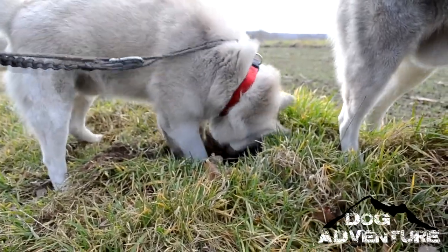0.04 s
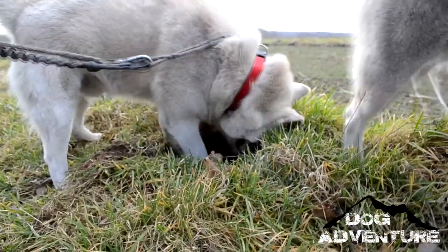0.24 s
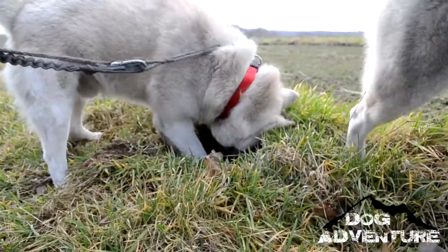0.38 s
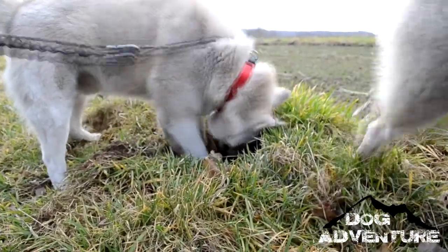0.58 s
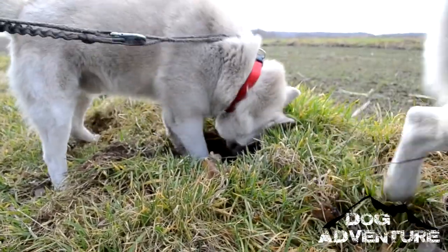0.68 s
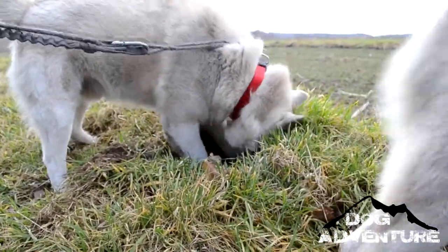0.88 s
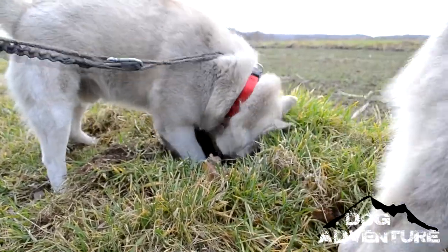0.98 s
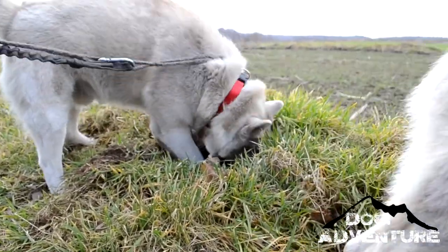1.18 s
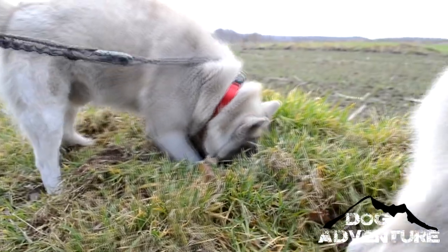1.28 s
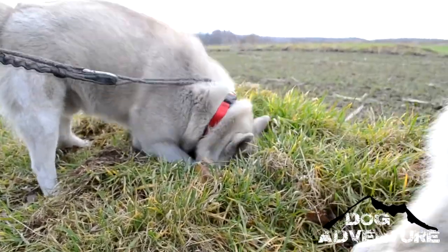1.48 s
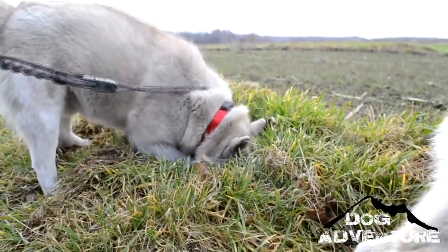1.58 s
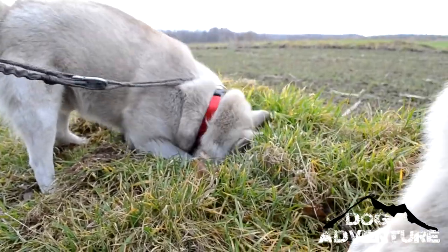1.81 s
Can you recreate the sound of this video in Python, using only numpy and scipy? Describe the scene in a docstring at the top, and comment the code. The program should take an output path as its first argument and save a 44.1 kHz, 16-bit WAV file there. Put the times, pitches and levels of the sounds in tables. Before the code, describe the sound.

A dog digs in grassy turf with dull paw thuds and dry rustling, then snuffles.

```python
"""A grassy field in faint wind: one dog digs while a second steps past close to the microphone.
Paws thud dully on the turf and loose soil settles after each blow. Dry blades rustle and rasp,
stalks snap, roots tear fibre by fibre, and the digging dog puffs air through the soil in its hole.
Everything is heard close up and without echo, on a small microphone with a dip in the treble."""
import sys
import numpy as np
from scipy import signal
from scipy.fft import rfft, irfft
from scipy.io import wavfile

SR = 44100
rng = np.random.default_rng(int(sys.argv[2]) if len(sys.argv) > 2 else 0)


def transcribe(u):
    """Save the signal u as a 16-bit wav file named by the first command-line argument.

    u: samples, shape (n,) or (channels, n), limited to [-1, 1]; the rate is SR.
    q: integer samples, one column per channel.
    """
    v = np.clip(np.atleast_2d(u).T, -1, 1)
    q = np.round(v * 32767).astype(np.int16)
    wavfile.write(sys.argv[1], SR, q)


N = 81585

# Paws striking the turf. Each row: time in seconds, peak level in dB, pitch in Hz.
PAW_BLOWS = [(0.4424, -36.5, 148), (0.4592, -29, 216), (0.477, -17, 198), (0.4831, -19.5, 255),
             (.487, -29, 221), (0.5107, -33, 219), (.5195, -33.5, 346), (0.5252, -26.5, 169),
             (0.5474, -18.5, 160), (0.5693, -22.5, 370), (0.5718, -16, 480), (0.59, -33.5, 360),
             (0.6097, -33.5, 219), (0.6403, -13.5, 192), (.6518, -21.5, 285), (0.6568, -29, 195),
             (0.6798, -27.5, 255), (0.687, -31.5, 280), (0.7078, -25.5, 168), (0.7282, -31, 390),
             (0.7317, -30, 282), (.7527, -22, 158), (0.7631, -29.5, 231), (0.7817, -38, 150),
             (0.8032, -26.5, 194), (0.8819, -29, 185), (.898, -36.5, 207), (0.965, -41, 300),
             (1.056, -42.5, 332), (1.1345, -28.5, 122), (1.141, -27, 454), (1.1442, -11, 335),
             (1.1549, -26.5, 120), (1.161, -31.5, 242), (1.222, -40, 330), (1.448, -40.5, 163),
             (1.486, -36.5, 107), (1.7700, -35.5, 170), (1.7942, -36.5, 244), (1.8044, -35.5, 194)]
TURF_CYCLES = 0.55  # turf hardly rings
# Loose soil settling after a blow. Each row: frequency in Hz, gain in dB.
CRUMBLE_SPECTRUM = [(30, -21), (100, -7), (250, 4.5), (500, -8.5), (800, -10.5), (1500, -32), (3000, -60)]
CRUMBLE_DB, CRUMBLE_DECAY_S = -18.5, 0.0074  # level is relative to the blow
# The ground trembling under the paws. Each row: time in seconds, level in dB.
TREMOR_LEVELS = [(0, -87), (.19, -82), (.24, -60), (.32, -60), (.41, -74), (.47, -36), (.7, -40),
                 (.86, -49), (.96, -69), (1.1, -56), (1.28, -76), (1.42, -49), (1.52, -50.5), (1.58, -76),
                 (1.68, -67.5), (1.78, -50.5), (1.85, -56)]
# The low tone of that trembling. Each row: frequency in Hz, gain in dB.
TREMOR_SPECTRUM = [(15, -46), (40, -0.5), (100, 0.5), (200, -10), (400, -19), (700, -31), (1500, -67)]

# Legs brushing the grass. Each row: time in seconds, level in dB, brightness in dB per octave.
GRASS_BRUSHING = [(0, -55.5, 0.5), (.1, -50, -1), (.195, -45.5, -0.5), (.235, -36, 0), (.28, -40.5, -1.2),
                  (.37, -43, -1), (.46, -42, -.5), (.53, -38, 0.5), (.555, -41, 0.5), (.59, -37, 1.5),
                  (.64, -43, 0), (.7, -42.5, 1), (.77, -37.5, 1), (.815, -41.5, -0.5), (.88, -39.5, 2),
                  (1.0, -44, -1.5), (1.04, -47, 0), (1.12, -51.5, -2.6), (1.2, -46.5, -1.5),
                  (1.52, -49.5, -2.5), (1.63, -61, -3.5), (1.73, -61, -3), (1.765, -52, -2),
                  (1.79, -60.5, -1.5), (1.85, -51, -.5)]
# The tone of dry blades, close up. Each row: frequency in Hz, gain in dB.
GRASS_SPECTRUM = [(100, -8.5), (400, -6), (800, -2.5), (1300, 0), (1950, 1), (2450, -2), (3200, 0.5),
                  (4500, -4), (7000, -4), (9300, -0.5), (11000, -11)]

# Roots and tufts tearing. Each row: peak time, rise and fall in seconds, level in dB.
ROOT_PULLS = [(0.853, 0.021, 0.019, -30.5), (0.899, 0.0088, 0.02, -36.5), (.941, .008, 0.017, -41),
              (0.9628, .0006, 0.0072, -32.5), (0.991, 0.021, 0.017, -38)]
# The tone of breaking root fibres. Each row: frequency in Hz, gain in dB.
ROOT_SPECTRUM = [(150, -19), (600, -3.5), (1400, 4), (2500, 3), (3900, 0.5), (5000, 8), (6400, 2),
                 (9000, 0), (11000, -3.5)]

# Dry stalks breaking. Each row: start in seconds, level in dB, pitch in Hz, decay in seconds.
STALK_SNAPS = [(0.015, -39, 4000, .001), (.023, -41, 5000, 0.0012), (0.1204, -35, 3460, 0.001),
               (.156, -46, 6000, .002), (.1698, -27, 6400, 0.0015), (0.2058, -34, 5000, 0.00084),
               (0.2085, -29, 3460, 0.0016), (0.3, -37, 3190, 0.0053), (.431, -38, 6070, 0.0025),
               (0.476, -37.5, 6050, 0.0038), (0.5002, -34, 4000, 0.0018), (.553, -26.5, 6960, 0.00072),
               (0.564, -24.5, 5700, 0.00064), (0.578, -30.5, 7600, 0.0029), (0.6224, -38, 7000, 0.0013),
               (.6625, -35, 8000, .0012), (0.708, -31.5, 9000, 0.0021), (.9622, -29, 3600, 0.0013),
               (.968, -37, 5000, .0015), (1.052, -46, 8000, 0.0017), (1.208, -40, 2500, 0.0033),
               (1.3985, -34.5, 3460, 0.0013), (1.4474, -34, 5000, 0.00045), (1.5353, -33, 4000, 0.00063),
               (1.611, -41, 6000, 0.00055), (1.756, -50, 8000, 0.0031)]
SNAP_OCTAVES, SNAP_TOP_HZ = 0.84, 10400  # half width around the pitch; upper limit of the splintering

# Puffs with the muzzle down in the hole. Each row: start in seconds, length in seconds, level in dB.
NOSE_PUFFS = [(1.191, .06, -48), (1.244, 0.082, -45), (1.373, 0.032, -41.5), (1.406, 0.048, -41.5),
              (1.465, 0.084, -50)]
PUFF_RISE_S, PUFF_FALL_S = 0.02, 0.03
# The hiss at the muzzle. Each row: frequency in Hz, gain in dB.
PUFF_SPECTRUM = [(150, -13), (500, -8.5), (1000, -2), (1600, -1), (2300, -3), (3400, -2), (4800, -3),
                 (6500, -6.5), (9000, -6.5), (11000, -13.5)]

# Blades and claws dragging. Each row: middle and length in seconds, pitch in Hz, level in dB.
DRAGS = [(0.197, 0.055, 860, -50), (.24, 0.024, 3770, -45), (0.283, 0.061, 1950, -52),
         (0.447, 0.21, 1970, -49), (0.526, 0.026, 3830, -43.5), (0.653, 0.037, 1870, -51),
         (0.678, 0.012, 3260, -42.5), (0.792, 0.055, 3120, -45), (1.233, 0.2, 1610, -54.5),
         (1.513, 0.073, 1520, -52.5)]
RASP_WIDTH_HZ, RASP_WIDENING = 68, 0.036  # half width, plus a share of the pitch

# The breeze behind the dogs. Each row: frequency in Hz, gain in dB.
WIND_SPECTRUM = [(20, -19), (60, -9), (200, -5.5), (600, -2.5), (1400, -8), (3200, -7), (6000, -10),
                 (10000, -16)]
WIND_DB = -57

# The microphone's fading top end. Each row: frequency in Hz, gain in dB.
MIC_ROLL_OFF = [(10000, -2.5), (10600, -5), (11000, -12.5), (11500, -23.5)]
NOTCH_HZ, NOTCH_WIDTH_HZ, NOTCH_DB, BAND_LIMIT_HZ = 7890, 300, -7, 11600


def paws():
    """Each blow is one heavily damped swing of the turf, then settling soil; the ground trembles below."""
    out, lead_s = np.zeros(N), 0.03
    t = np.arange(-lead_s, 2 * lead_s, 1 / SR)
    for s, db, hz in PAW_BLOWS:
        swing = np.sin(2 * np.pi * hz * t) / np.cosh(2 * hz * t / TURF_CYCLES)
        settling = np.clip(t * hz + 1, 0, 1) * np.exp(-np.maximum(t, 0) / CRUMBLE_DECAY_S)
        crumble = colour(rng.standard_normal(len(t)), CRUMBLE_SPECTRUM) * settling
        add(out, s - lead_s, amp(db) * (swing / swing.max() + amp(CRUMBLE_DB) * crumble))
    tremor = amp(curve(TREMOR_LEVELS)) * colour(rng.standard_normal(N), TREMOR_SPECTRUM)
    return out + tremor


def grass():
    """Blades slide and tick against each other, brighter when they are pushed fast."""
    slide_share = 0.57  # of the power
    ticks = np.sqrt(1 - slide_share) * crackle(per_s=3500, spread_db=1.5)
    slide = np.sqrt(slide_share) * rng.standard_normal(N)
    f, t, spectra = signal.stft(colour(ticks + slide, GRASS_SPECTRUM), SR, nperseg=256)
    times, _, brightness = np.transpose(GRASS_BRUSHING)
    octaves = np.log2(np.maximum(f, 800) / 3500)  # the tone tilts about 3500 Hz
    tilt = amp(octaves[:, None] * np.interp(t, times, brightness))
    blades = signal.istft(spectra * tilt, SR, nperseg=256)[1][:N]
    rustle = blades * amp(curve(GRASS_BRUSHING))
    return rustle * flutter(depth_db=1.04, span_s=0.024) * flutter(depth_db=1.05, span_s=0.0011)


def roots():
    """Each pull breaks a dense run of fibres that swells and dies."""
    pull, t = np.zeros(N), np.arange(N) / SR
    for peak, rise, fall, db in ROOT_PULLS:
        width = np.where(t < peak, rise, fall)
        pull += amp(db) * np.exp(-((t - peak) / width) ** 2)
    fibres = crackle(per_s=5500, spread_db=5.5) + 1.13 * rng.standard_normal(N)
    return pull * colour(fibres, ROOT_SPECTRUM)


def stalks():
    """A dry stalk snaps in a burst of splintering that dies within milliseconds."""
    out, t = np.zeros(N), np.arange(1024) / SR
    f = np.fft.rfftfreq(len(t), 1 / SR) + 1
    for start, db, hz, decay in STALK_SNAPS:
        band = 1 / (1 + (np.log2(f / hz) / SNAP_OCTAVES) ** 2) / (1 + (f / SNAP_TOP_HZ) ** 20)
        phases = np.exp(2j * np.pi * rng.random(len(f)))
        fade = np.exp(-t / decay)
        splinter = unit(irfft(band * phases) * fade)
        add(out, start, amp(db) * splinter * np.sqrt(np.mean(fade ** 2)))
    return out


def snuffles():
    """Puffs of air from the dog's nose hiss through soil and stir the blades."""
    power, t = np.zeros(N), np.arange(N) / SR
    for start, length, db in NOSE_PUFFS:
        rise = np.clip((t - start) / PUFF_RISE_S, 0, 1)
        fall = np.exp(-np.maximum(t - start - length, 0) / PUFF_FALL_S)
        power += (amp(db) * rise * fall) ** 2
    air = rng.standard_normal(N) + 0.5 * crackle(per_s=3200, spread_db=1.0)
    return np.sqrt(power) * colour(air, PUFF_SPECTRUM) * flutter(depth_db=1.73, span_s=0.0038)


def rasps():
    """A dragging blade or claw excites one faint, narrow resonance by friction."""
    out, t, f = np.zeros(N), np.arange(N) / SR, np.fft.rfftfreq(N, 1 / SR)
    for middle, length, hz, db in DRAGS:
        resonance = 1 / (1 + ((f - hz) / (RASP_WIDTH_HZ + RASP_WIDENING * hz)) ** 2)
        ring = unit(irfft(rfft(rng.standard_normal(N)) * resonance, N))
        swell = np.exp(-2 * ((t - middle) / length) ** 2)
        out += amp(db) * ring * swell
    return out


def wind():
    """A faint, wavering breeze over the open field."""
    return amp(WIND_DB) * colour(rng.standard_normal(N), WIND_SPECTRUM) * flutter(depth_db=3, span_s=0.093)


def crackle(per_s, spread_db, cycles=0.92):
    """Tiny fractures of random size, each ringing one fibre for a cycle or two; broadband overall."""
    out, t = np.zeros(N), np.arange(512) / SR
    pitches = np.linspace(600, 11000, 24)
    for hz in pitches:
        size = amp(spread_db * np.minimum(rng.exponential(1, N), 3.5))
        clicks = size * rng.choice([-1, 1], N) * (rng.random(N) < per_s / len(pitches) / SR)
        fibre = unit(np.sin(2 * np.pi * hz * t) * np.exp(-t * hz / cycles))
        out += signal.oaconvolve(clicks, fibre)[:N]
    return unit(out)


def flutter(depth_db, span_s):
    """A random gain that makes a level waver, more slowly for a longer span."""
    f = np.fft.rfftfreq(N, 1 / SR)
    drift = irfft(rfft(rng.standard_normal(N)) * np.exp(-(f * span_s) ** 2), N)
    return amp(depth_db * unit(drift))


def colour(x, spectrum):
    """Gives a sound a spectrum and an rms of 1."""
    hz, db = np.transpose(spectrum)
    f = np.fft.rfftfreq(len(x), 1 / SR)
    gain = amp(np.interp(np.log(f + 1), np.log(hz), db))
    return unit(irfft(rfft(x) * gain, len(x)))


def curve(rows):
    """A table's levels, joined by straight lines in time."""
    times, levels = np.transpose(rows)[:2]
    return np.interp(np.arange(N) / SR, times, levels)


def amp(db):
    """Decibels to gain."""
    return 10 ** (np.asarray(db) / 20)


def unit(x):
    """Scales to an rms of 1."""
    return x / np.sqrt(np.mean(x ** 2) + 1e-20)


def add(mix, start_s, sound):
    """Mixes a sound in at a time."""
    part = mix[max(round(start_s * SR), 0):][:len(sound)]
    part += sound[:len(part)]


def scene():
    """Both dogs at close range with the breeze behind them, in mono and without echo."""
    return (paws() + grass() + rasps() + roots() + snuffles() + stalks() + wind())[None]


def record(dry):
    """A small microphone with a narrow treble dip, a fading top end and a sharp band limit."""
    f = np.fft.rfftfreq(2 * N, 1 / SR)
    notch_db = NOTCH_DB * np.exp(-((f - NOTCH_HZ) / NOTCH_WIDTH_HZ) ** 2)
    roll_off_db = np.interp(f, *np.transpose(MIC_ROLL_OFF))
    heard = irfft(rfft(dry, 2 * N) * amp(notch_db + roll_off_db))[:, :N]
    low_pass = signal.firwin(511, BAND_LIMIT_HZ, window=("kaiser", 9), fs=SR)
    return signal.oaconvolve(heard, low_pass[None], "same")


dry = scene()
out = record(dry)
transcribe(out)
```